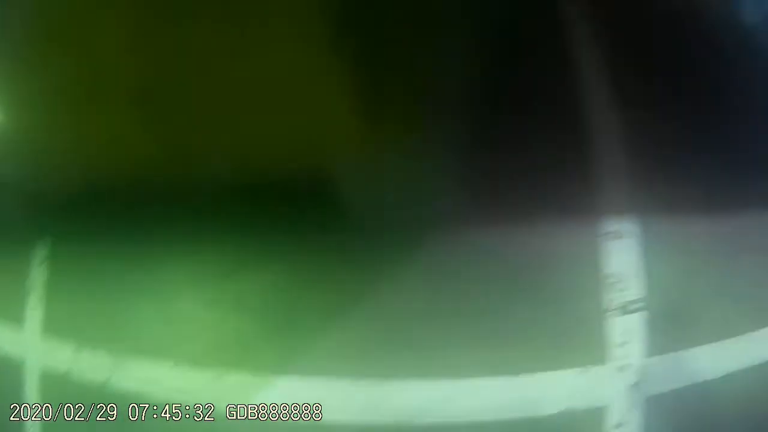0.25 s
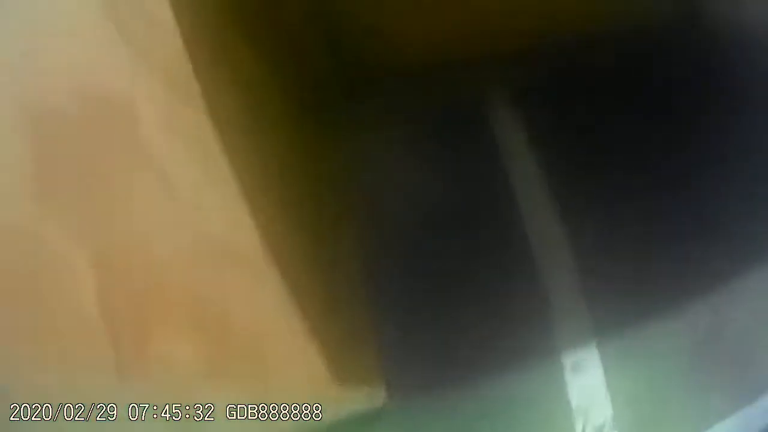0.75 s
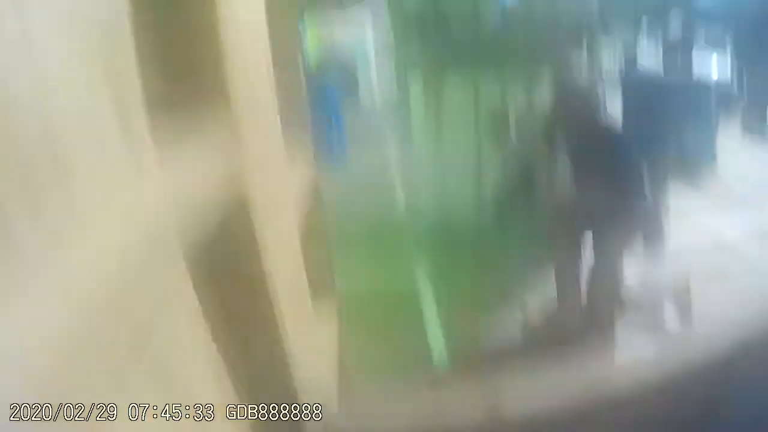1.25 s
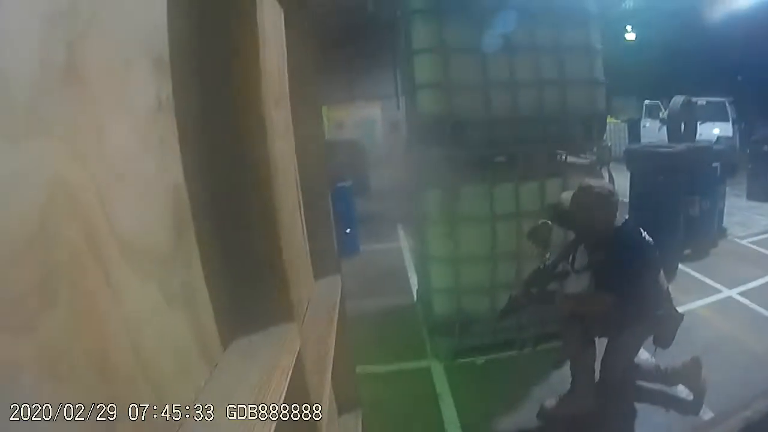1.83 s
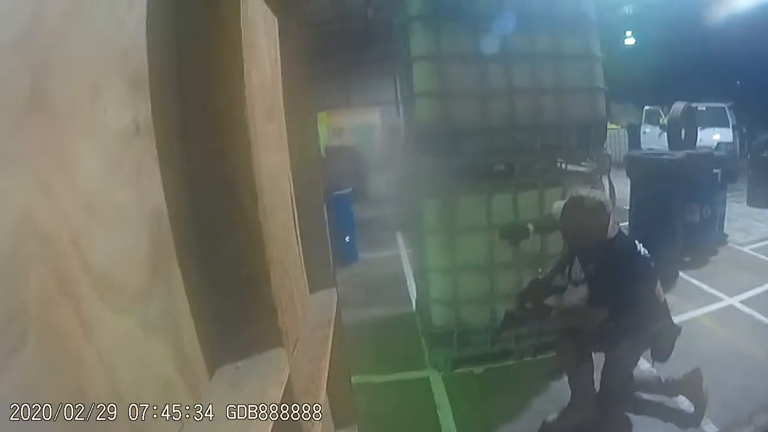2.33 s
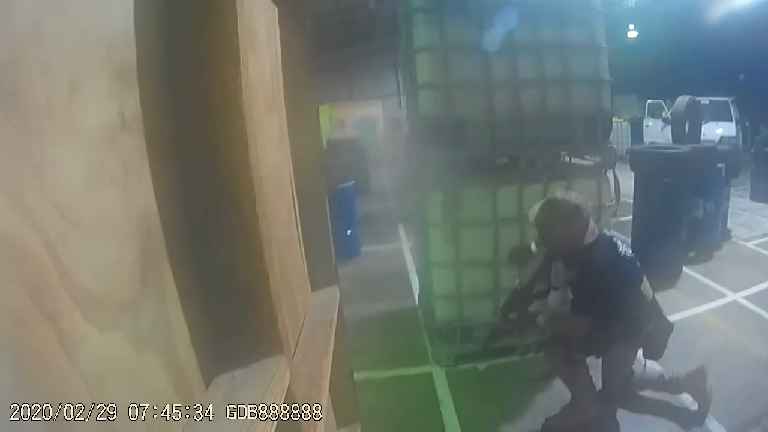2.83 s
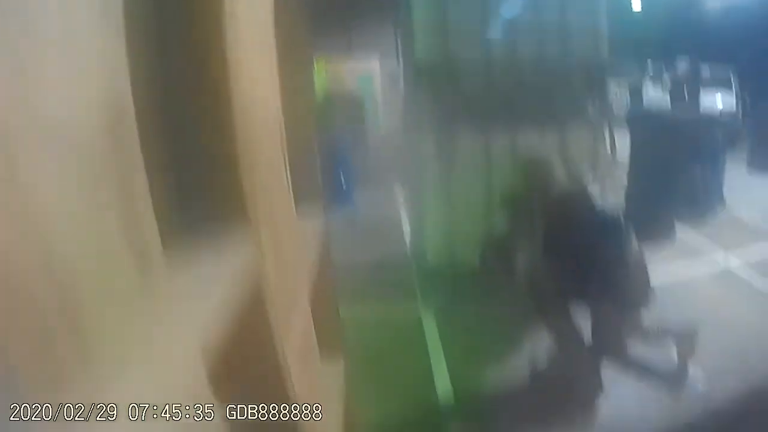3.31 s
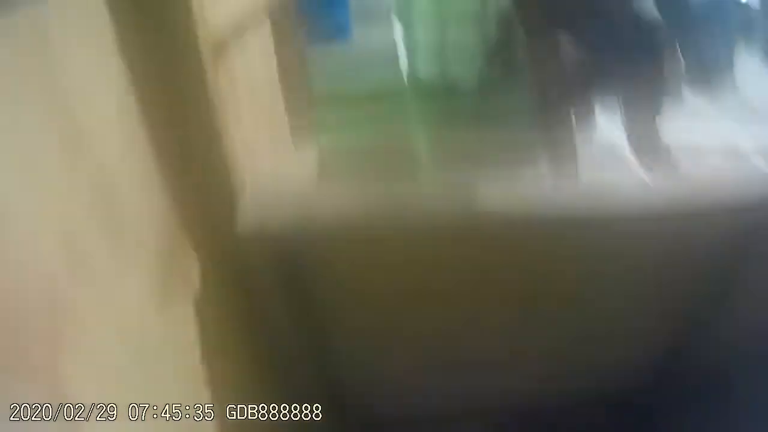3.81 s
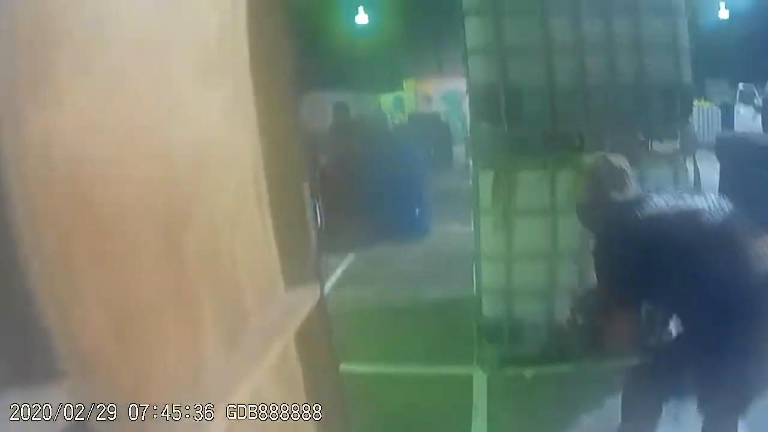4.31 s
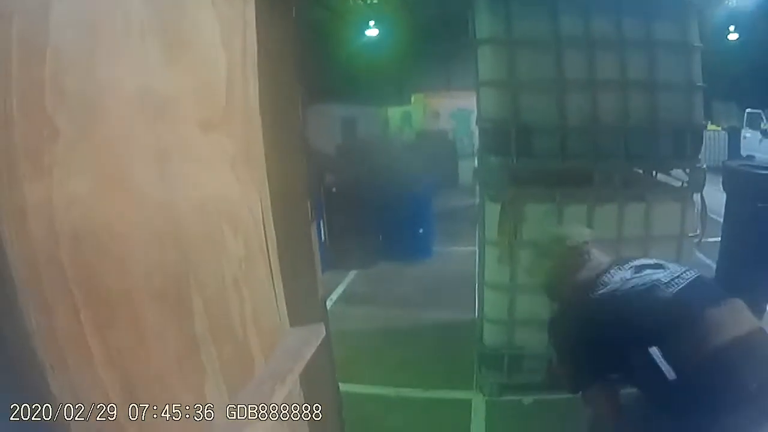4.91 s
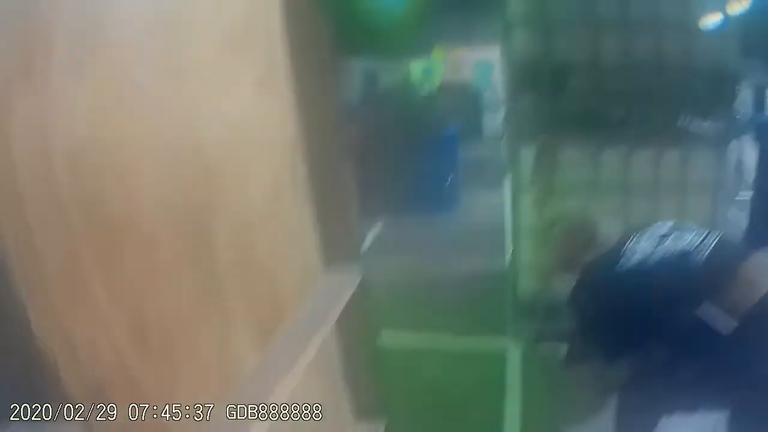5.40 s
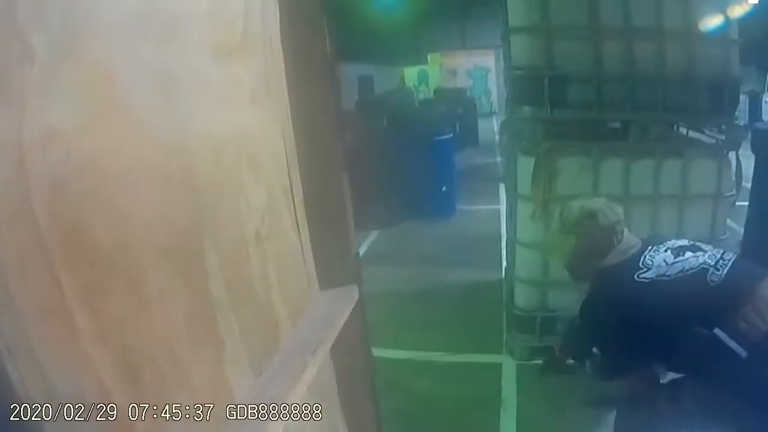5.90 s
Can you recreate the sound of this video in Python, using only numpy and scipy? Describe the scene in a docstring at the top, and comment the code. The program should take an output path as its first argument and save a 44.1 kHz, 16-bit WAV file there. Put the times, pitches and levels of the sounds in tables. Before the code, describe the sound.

Very close, through a microphone fixed to an electric gel blaster in an indoor arena: quiet air and soft bumps first, a few sharper plastic taps, then gears whirr and the piston hammers about twenty times a second, thumping, rattling and clipping. A brief release splits the burst. Hiss and light taps follow, then a second, longer split burst ends with the gears stopping.

```python
"""Two long rattling bursts ring out in an indoor arena: an electric gel blaster, heard from a camera mounted on it.
Each burst is two trigger pulls: a motor winds a spring through whirring gears, and the piston slams home about
20 times a second. Its rebounds thump and rattle the plastic body and overload the microphone.
After most releases the gears coast into one last slam. Faint handling knocks come first and again between the
bursts, over hall air, a separate hiss, a thin whine and a rumbling mount."""
import sys
import numpy as np
from scipy import signal
from scipy.io import wavfile
from scipy.ndimage import uniform_filter1d

SR = 44100
rng = np.random.default_rng(int(sys.argv[2]) if len(sys.argv) > 2 else 0)


def digitize_waveform(pressure):
    """Quantize a signal to 16-bit integers and store it at the path in sys.argv[1].

    Rows of a 2-D input are taken as channels; values are limited to [-1, 1].
    """
    field = np.atleast_2d(pressure).T
    bounded = np.clip(field, -1, 1)
    quanta = np.round(bounded * 32767).astype(np.int16)
    wavfile.write(sys.argv[1], SR, quanta)


N = 271194
TIME = np.arange(N) / SR

# All table levels are relative unless marked rms.
# How the body answers a heavy blow: f/Hz, level/dB
THUMP_SPECTRUM = [(20, -22.5), (55, -19), (100, -7.5), (150, 2), (260, 0.5), (450, -3.5), (750, -5),
                  (1100, -12), (2000, -27.5), (4000, -56.5), (16000, -143)]
# Dry tick of plastic on plastic: f/Hz, level/dB
TICK_SPECTRUM = [(50, -20), (300, -3), (1200, 0), (2800, -4), (4500, -14), (6500, -30), (16000, -38)]
# Trigger pulls: motor on t/s, first slam t/s, motor off t/s, cycle at full speed/s,
# time lost spinning up/s, extra rattle of the first slam/dB
TRIGGER_PULLS = [(1.425, 1.5270, 2.222, .05077, .0059, 7), (2.349, 2.4154, 3.075, .05090, .0060, 7.5),
                 (4.232, 4.2949, 5.255, .05104, .0092, 9.5), (5.345, 5.3858, 6.2, .05114, .0073, 4)]


def amp(db):
    """Turns decibels into a gain."""
    return 10 ** (np.asarray(db) / 20)


def unit(x):
    """Scales a sound to rms 1."""
    return x / np.sqrt(np.mean(x ** 2) + 1e-20)


def read(points, hz):
    """Reads a table at any frequency, with frequency on a log scale."""
    f, value = np.transpose(points)
    return np.interp(np.log(hz + 1), np.log(f + 1), value)


def level(curve):
    """Turns a table of times and dB into a gain for every sample."""
    return amp(np.interp(TIME, *np.transpose(curve)))


def add(mix, s, sound):
    """Mixes a sound in at time s, in seconds."""
    part = mix[max(round(s * SR), 0):][:len(sound)]
    part += sound[:len(part)]


def response(points, size=8192):
    """Makes a click with the given spectrum that never starts early (minimum phase), with peak 1."""
    hz = abs(np.fft.fftfreq(size, 1 / SR))
    log_gain = np.log(amp(read(points, hz)))
    spectrum = np.exp(np.conj(signal.hilbert(log_gain)))
    click = np.fft.ifft(spectrum).real[:size // 2]
    return click / abs(click).max()


def through(x, h):
    """Passes x through something that answers a click with h."""
    return signal.oaconvolve(x, h)[:N]


def noise(points):
    """Steady noise of rms 1 with the given spectrum."""
    return unit(through(rng.standard_normal(N), response(points)))


def spin_up(k, lag):
    """Time lost by cycle k while the motor gathers speed, approaching lag, in seconds."""
    spin_up_cycles = .8
    return lag * (1 - np.exp(-k / spin_up_cycles))


def shots():
    """Lists each slam as (t/s, thump/dB, rattle/dB, rebounds/dB): near-steady cycles in each pull, then coasting."""
    # Last slams, as the gears coast after a release: t/s, rattle level/dB
    coast_slams = [(2.2748, 2.5), (3.105, 4.5), (5.3163, 4)]
    coast_thump_db, coast_rebound_db = -1.4, -18
    slam_thump_db, slam_rattle_db, rebound_db = 0.1, -1.96, -1.8
    first_thump_db, first_rebound_db = 1.5, 4  # extra on the first slam of a pull
    sag_db_per_s = 2.5  # the thump weakens as the trigger is held
    # Chance from shot to shot: thump/dB, rattle/dB, rebounds/dB
    shot_spread_db = (1.2, 1.5, 3)
    rows = []
    for _, first, off, cycle, lag, accent_db in TRIGGER_PULLS:
        k = np.arange(24)  # more cycles than any pull needs
        times = first + cycle * k + spin_up(k, lag)
        is_first = k == 0
        thump = slam_thump_db + first_thump_db * is_first - sag_db_per_s * (times - first)
        rattle = slam_rattle_db + accent_db * is_first
        rebound = rebound_db + first_rebound_db * is_first
        levels = np.c_[thump, rattle, rebound]
        levels = levels + rng.standard_normal(levels.shape) * shot_spread_db
        rows += list(np.c_[times, levels][times < off])
    return rows + [(s, coast_thump_db, db, coast_rebound_db) for s, db in coast_slams]


def shell(tick_db=-15):
    """One sharp contact sets the plastic shell's resonances ringing and adds a dry tick of its own."""
    # Resonances of shell and gearbox: f/Hz, width/Hz, level/dB (strength is also multiplied by width)
    resonances = [(400, 57, 1.5), (590, 68, -3), (730, 48, -53), (1070, 100, -14), (1147, 97, 14.5),
                  (1406, 133, 16), (1852, 60, 2), (2212, 28, -3), (2598, 39, 0), (3450, 130, -69),
                  (4260, 600, -96), (7400, 460, -38.5)]
    tick = response(TICK_SPECTRUM)
    t = np.arange(len(tick)) / SR
    ring = np.zeros(len(tick))
    for hz, width, db in resonances:
        fade = np.exp(-np.pi * width * t)  # a wider resonance dies sooner
        ring += amp(db) * width * fade * np.sin(2 * np.pi * hz * t)
    return ring / abs(ring).max() + amp(tick_db) * tick


def contact(chatter_s, loose=.6, size=2048):
    """One firm strike together with a dying chatter of loose parts, which takes over as loose nears 1."""
    chatter = rng.standard_normal(size) * np.exp(-np.arange(size) / SR / chatter_s)
    loose = np.clip(loose, 0, 1)
    force = loose * chatter / np.linalg.norm(chatter)
    force[0] += np.sqrt(1 - loose ** 2)
    return force


def firing(slams, thump_db=1.0, rattle_db=-3, tick_db=-16, thump_spread_db=1.14,
           rattle_spread_db=1.2, late_s=.0105, chatter_s=0.0023):
    """Each slam shoves the body and bounces; every bounce rattles the shell, the early ones with a hard tick."""
    # Blows within each shot: delay/s, thump level/dB, rattle level/dB, timing scatter/s, looseness 0-1
    blows = [(.0001, 0.5, -15, .00002, 0.75), (.0013, -20.5, -4, 0.000033, 1),
             (.0031, -11, -1.5, .0001, 0.66), (.0050, -3, -2.5, 0.000047, 0.4),
             (.0074, -3, -4.5, .0001, 0.6), (.0084, -29, -1.5, .0001, 0.94),
             (0.0127, -10, -7.5, 0.00025, .8), (0.0173, -9, -5.5, 0.00033, 1),
             (.0200, -9, -6.5, .0005, 0.9), (.0228, -14, -23, 0.00033, 0.49)]
    let_go_lead_s, let_go_db = .0118, -22  # the gears tug the body back before they free the piston
    tick_fade_s = 0.0051  # later rebounds land softly and lose their tick
    brighten = .35  # harder slams tick more: dB of extra tick per dB of rattle
    shove, rattle, ticks = np.zeros((3, N))
    for s, shot_thump, shot_rattle, rebound in slams:
        add(shove, s - let_go_lead_s, -amp([let_go_db + rebound]))
        for delay, heavy, sharp, scatter, loose in blows:
            time_chance, thump_chance, rattle_chance = rng.standard_normal(3)
            at = s + delay + scatter * time_chance
            late = delay > late_s  # late blows follow the rebound level instead of the slam's
            blow_thump = heavy + (rebound if late else shot_thump) + thump_spread_db * thump_chance
            blow_rattle = sharp + (rebound if late else shot_rattle) + rattle_spread_db * rattle_chance
            force = amp(blow_rattle) * contact(chatter_s, loose)
            hardness = amp(brighten * shot_rattle) * np.exp(-(delay / tick_fade_s) ** 2)
            add(shove, at, amp([blow_thump]))
            add(rattle, at, force)
            add(ticks, at, force * hardness)
    plastic = through(rattle, shell(tick_db=-44.5))
    plastic += amp(tick_db) * through(ticks, response(TICK_SPECTRUM))
    return amp(rattle_db) * plastic - amp(thump_db) * through(shove, response(THUMP_SPECTRUM))


def motor_drive():
    """Gain of the motor: a quick start with a surge, a steady run, a run-down after release."""
    surge_db, surge_s = 4.5, 0.2  # the motor strains hardest as it starts
    rise_s, run_down_db_per_s = 0.0049, 180
    drive = np.zeros(N)
    for on, _, off, *_ in TRIGGER_PULLS:
        age = np.maximum(TIME - on, 0)
        db = surge_db * np.exp(-age / surge_s) - run_down_db_per_s * np.maximum(TIME - off, 0)
        start = np.minimum(age / rise_s, 1)
        drive = np.maximum(drive, start * amp(db))
    return drive


def gears(slams, drive, mesh_hz=1165, waver=0.0336, teeth_db=-17, grind_db=7, grind_s=0.0047):
    """Gear teeth mesh at an unsteady rate within a noisy whirr, and grind harder around each slam."""
    # Colour of the gear train's whirr: f/Hz, level/dB
    whirr_spectrum = [(30, -8), (100, -5.5), (170, -0.5), (280, -2.5), (410, 4.5), (600, -1), (850, -9),
                      (1030, -0.5), (1190, 5.5), (1330, 0.5), (1500, -5.5), (1900, -17), (2650, -23),
                      (3200, -28), (3500, -33.5), (3850, -45), (4400, -30), (6200, -65), (8000, -46.5),
                      (9000, -51.5), (16000, -81)]
    motor_db = -22.5
    wander = unit(uniform_filter1d(rng.standard_normal(N), size=300))
    speed = mesh_hz * (1 + waver * wander)  # teeth per second
    teeth_passed = np.floor(np.cumsum(speed) / SR)
    clicks = np.diff(teeth_passed, prepend=0)
    teeth = unit(clicks - speed / SR)  # less their average, so no offset builds up
    strain_db = grind_db * sum(np.exp(-((TIME - s) / grind_s) ** 2) for s, *_ in slams)
    rough = rng.standard_normal(N) + amp(teeth_db) * teeth
    whirr = unit(through(rough, response(whirr_spectrum)))
    return whirr * drive * amp(motor_db + strain_db)


def spring(slams, zing_hz=7950, zing_db=-46, lead_s=0.006, length_s=0.0023, again_s=0.023, again_db=-3):
    """The released spring zings as the piston flies forward, and again as it rebounds."""
    t = np.arange(SR // 20) / SR
    burst = np.exp(-t / length_s)
    drive = np.zeros(N)
    for s, _, _, rebound in slams:
        add(drive, s - lead_s, burst)
        add(drive, s + again_s, amp(again_db + rebound) * burst)
    ring = t * np.exp(-np.pi * 800 * t) * np.cos(2 * np.pi * zing_hz * t)
    return amp(zing_db) * through(drive * rng.standard_normal(N), ring / np.linalg.norm(ring))


def knock(ring, thud, thump_db, rattle_db, chatter_s, firm_s=0.0014):
    """One knock shoves and rattles the body; the longer it chatters, the softer its start."""
    loose = 1 - np.exp(-chatter_s / firm_s)
    rattle = signal.fftconvolve(contact(chatter_s, loose), ring)
    shove = signal.fftconvolve(contact(chatter_s, loose), thud)
    return amp(rattle_db) * rattle - amp(thump_db) * shove


def clacks(level_db=-2):
    """Hard knocks of the gearbox taking up and dropping its load."""
    # Clacks as it starts and stops: t/s, thump level/dB, rattle level/dB, chatter decay time/s
    gearbox_clacks = [(1.4283, -25, -17, 0.0019), (1.459, -8, 16, 0.0025), (1.4616, -23, 10, .0011),
                      (1.4848, 0, -4, 0.0036), (1.4973, 0, -19, 0.0011), (2.2261, -9, -23, .0013),
                      (2.369, -15, -18, .002), (2.3781, 2, -3, 0.0016), (3.0637, -3.5, -13, 0.0021),
                      (3.148, -11, -24, 0.011), (3.175, -25, -47, 0.0083), (4.2455, -11, -9, 0.0022),
                      (4.2540, -28, 13, 0.00064), (5.2596, -3, -20, 0.0021), (5.307, -18, -21, 0.0043),
                      (5.341, 4.5, -21, 0.0092), (5.3562, -9, -34, 0.0017)]
    out, ring, thud = np.zeros(N), shell(tick_db=-1), response(THUMP_SPECTRUM)
    for s, *blow in gearbox_clacks:
        add(out, s, knock(ring, thud, *blow))
    return amp(level_db) * out


def handling(level_db=-2, thin_hz=700):
    """Faint bumps on the same body; light taps miss its low ringing and soft contacts lose their treble."""
    # Hands and gear bumping the blaster: t/s, thump level/dB, rattle level/dB, chatter decay time/s, dull above f/Hz
    bumps = [(.044, -48, -43, .008, 2000), (.092, -46, -39, .013, 1600), (.242, -45, -45, .013, 1500),
             (.4075, -46, -27, .003, 1900), (.445, -41, -60, .015, 600), (.572, -36, -35, .02, 1800),
             (.813, -38, -39, .019, 2500), (.883, -42, -22, .002, 6000), (.895, -29, -38, .025, 500),
             (.929, -35, -16.5, .0037, 6000), (.945, -36, -24, .003, 6000),
             (.9677, -45, -22.5, .0026, 9000), (.995, -48, -29, .0023, 7000),
             (1.263, -47, -36, .0023, 3000), (1.275, -46, -25, .003, 7000), (3.4212, -48, -24, .0023, 7000),
             (3.4548, -50, -25, .002, 7000), (3.5164, -46, -23, .002, 7000), (3.672, -33, -42, .02, 1000)]
    out, thud = np.zeros(N), response(THUMP_SPECTRUM)
    thin = signal.butter(2, thin_hz, "highpass", fs=SR)
    ring = signal.lfilter(*thin, shell(tick_db=-3.5))
    for s, heavy, sharp, chatter_s, top_hz in bumps:
        dull = signal.butter(4, top_hz, fs=SR)
        add(out, s, signal.lfilter(*dull, knock(ring, thud, heavy, sharp, chatter_s)))
    return amp(level_db) * out


def sway(slams, drive):
    """The springy camera mount swings after each slam, and rumbles more while the motor runs or the player moves."""
    # Lurches of the mount as the player moves: t/s, level/dB, half-width/s
    lurches = [(0.134, -61, 0.069), (0.61, -47.5, .07), (0.935, -38.5, .07), (3.7, -52, 0.073)]
    # Colour of the rumble: f/Hz, level/dB
    rumble_spectrum = [(8, -26), (22, -12.5), (32, 6), (48, -6.5), (80, -16.5), (200, -37), (1000, -79)]
    mount_hz, mount_decay_s, recoil_db = 30, 0.073, -29.5
    rest_db, firing_db, settle_s = -58.5, -49, .11
    t, kicks = np.arange(SR // 2) / SR, np.zeros(N)
    swing = amp(recoil_db) * np.exp(-t / mount_decay_s) * np.sin(2 * np.pi * mount_hz * t)
    for s, *_ in slams:
        add(kicks, s, swing)
    keep = np.exp(-1 / (settle_s * SR))
    shaken = signal.lfilter([1 - keep], [1, -keep], drive)  # follows the motor with a lag
    moved = sum(amp(db) * np.exp(-((TIME - s) / length) ** 2) for s, db, length in lurches)
    rumble_gain = amp(rest_db) + moved + amp(firing_db) * shaken
    return kicks + rumble_gain * noise(rumble_spectrum)


def hall(x):
    """The arena's faint tail is fading noise, each band dying at its own speed."""
    # Time to fade by 60 dB: f/Hz, t/s
    decay_times = [(100, 0.17), (1200, 0.73), (4000, 0.71), (12000, 0.224)]
    hz, t, bands = signal.stft(rng.standard_normal(SR), SR, nperseg=256)
    fade = amp(-60 * t / read(decay_times, hz)[:, None])
    tail = signal.istft(bands * fade, SR, nperseg=256)[1]
    return through(x, tail / np.linalg.norm(tail))


def far_tone(waver=.015):
    """A faint tone in the hall wavers in pitch, and comes and goes just before the first burst."""
    # One tone: start t/s, end t/s, f/Hz, peak level/dB
    start, end, hz, db = (1.09, 1.43, 552, -60)
    wander = unit(uniform_filter1d(rng.standard_normal(N), size=3000))
    pitch = hz * (1 + waver * wander)
    progress = np.clip((TIME - start) / (end - start), 0, 1)
    swell = np.sqrt(abs(np.sin(np.pi * progress)))
    return amp(db) * swell * np.sin(2 * np.pi * np.cumsum(pitch) / SR)


def background():
    """Hall air and a hiss that rises and falls are coloured noise; camera electronics whine and buzz every second."""
    # Quiet air of the hall: f/Hz, level/dB
    air_spectrum = [(40, 0), (150, -4), (330, -4.5), (520, -4), (660, -10), (900, -16.5), (1170, -1.5),
                    (1380, -12), (1560, -9), (2050, -20), (2600, -14), (3400, -24), (6000, -29),
                    (15500, -27.5)]
    # Even hiss, coloured by the camera's housing: f/Hz, level/dB
    hiss_spectrum = [(100, -28), (550, -12), (800, -9.5), (1130, 1), (1550, 3), (2050, -9), (2350, -1),
                     (2700, -1), (3500, -13.5), (4080, -21), (4600, -10), (5200, -25), (6800, -40),
                     (7700, -23), (9000, -39), (15000, -37)]
    # How the hiss rises and falls: t/s, rms level/dB
    hiss_level = [(0, -98), (.55, -74), (.75, -54), (.95, -50), (1.1, -56), (3.15, -52), (3.3, -44),
                  (3.5, -43), (3.7, -48.5), (4.2, -47.5), (6.15, -72)]
    # Steady whine of the electronics: f/Hz, rms level/dB
    whine_tones = [(6803, -89), (13607, -87.5)]
    air_db = -60
    buzz_hz, buzz_db, buzz_first_s, buzz_length_s, buzz_every_s = 11100, -75, .015, .075, 1.
    whine = sum(amp(db) * np.sqrt(2) * np.sin(2 * np.pi * hz * TIME) for hz, db in whine_tones)
    buzz_on = (TIME - buzz_first_s) % buzz_every_s < buzz_length_s
    gate = uniform_filter1d(1. * buzz_on, size=400)  # softened edges
    buzz = amp(buzz_db) * gate * np.sin(2 * np.pi * buzz_hz * TIME)
    air = amp(air_db) * noise(air_spectrum)
    hiss = level(hiss_level) * noise(hiss_spectrum)
    return air + hiss + whine + buzz


def scene(wet_db=-31):
    """The blaster's vibration reaches the microphone through the mount, which dulls it; the hall is far behind."""
    mic_top_hz = 9500
    slams, drive = shots(), motor_drive()
    body = firing(slams) + spring(slams) + gears(slams, drive) + clacks() + handling()
    blaster = signal.lfilter(*signal.butter(2, mic_top_hz, fs=SR), body)
    echo = amp(wet_db) * hall(blaster)
    return (blaster + echo + sway(slams, drive) + far_tone() + background())[None]


def record(dry):
    """The input clips hard when overloaded and sheds any offset; then the top band is cut off."""
    ceiling, edge_hz = .7, 16050
    doubled = signal.resample_poly(dry, 2, 1, axis=1)  # clip at twice the rate, to limit aliasing
    clipped = signal.resample_poly(np.clip(doubled, -ceiling, ceiling), 1, 2, axis=1)
    centred = signal.lfilter(*signal.butter(1, 3, "highpass", fs=SR), clipped)
    band_limit = signal.firwin(255, edge_hz, window=("kaiser", 9), fs=SR)
    return signal.oaconvolve(centred, band_limit[None], "same")


dry = scene()
out = record(dry)
digitize_waveform(out)
```